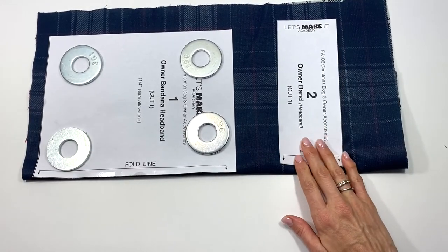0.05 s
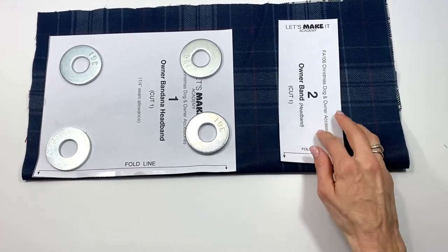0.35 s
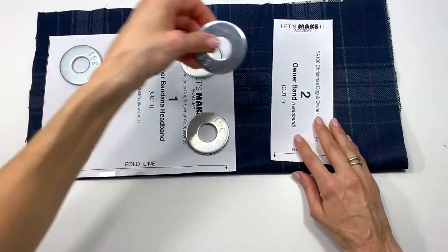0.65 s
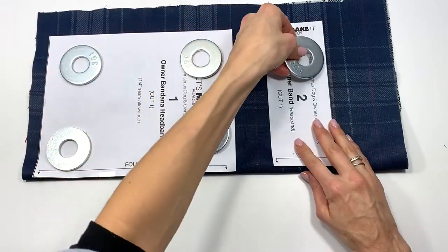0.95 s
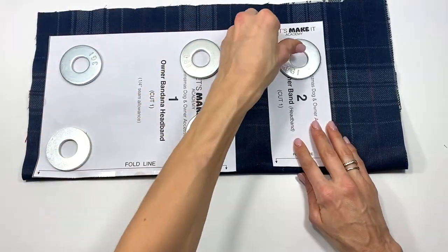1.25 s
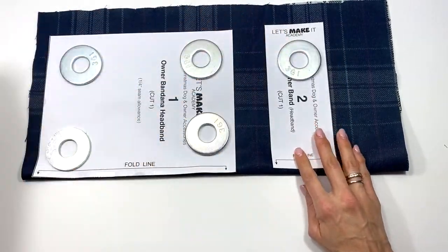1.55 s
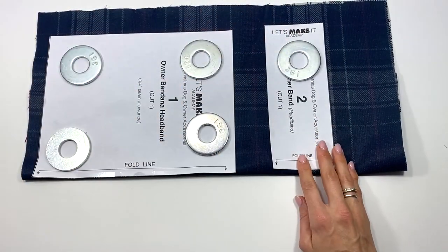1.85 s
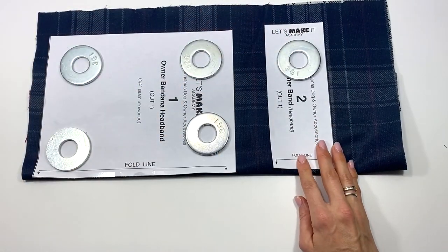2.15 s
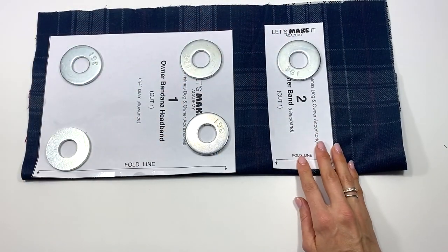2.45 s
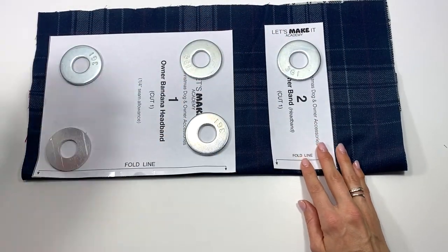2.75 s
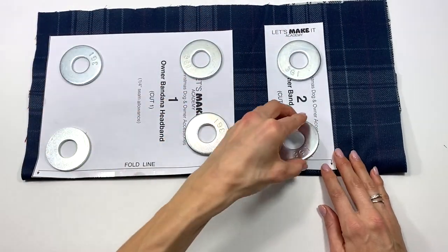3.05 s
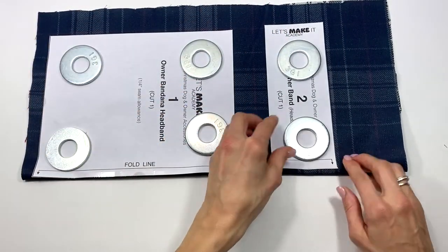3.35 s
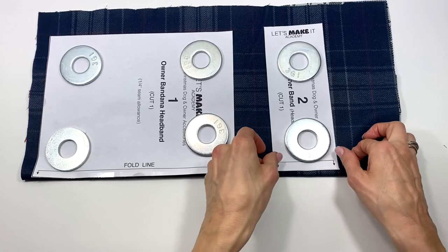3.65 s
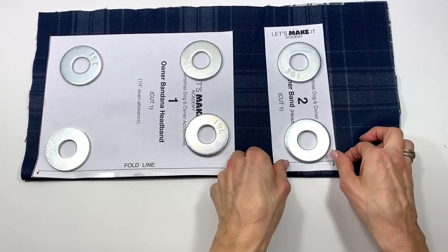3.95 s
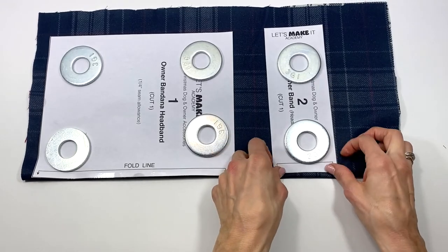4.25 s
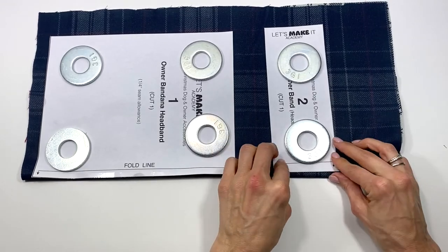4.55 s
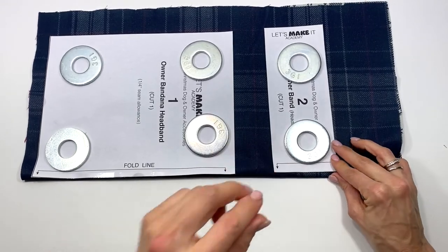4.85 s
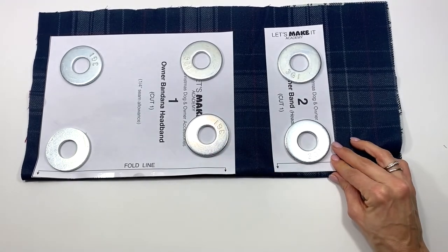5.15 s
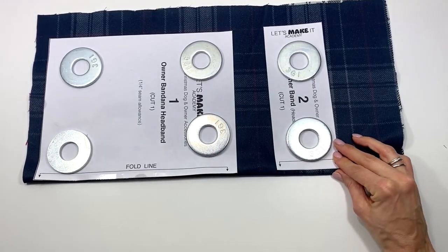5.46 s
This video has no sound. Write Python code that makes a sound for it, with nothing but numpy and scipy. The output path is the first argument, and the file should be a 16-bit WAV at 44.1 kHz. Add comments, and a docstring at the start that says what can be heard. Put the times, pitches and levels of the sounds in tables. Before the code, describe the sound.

Close up in a small quiet room, two steel washers are placed one at a time on a table padded with fabric and paper. Each is taken from a pile with a light scrape and a cluster of ringing clinks, then put down about a second later with a low, cushioned thump, the second landing in two quick knocks. Soft swishes of hands on paper run underneath, ending in a few light flicks and fingernail taps.

```python
"""Steel washers on a padded table

Heavy steel washers are picked off a pile and set down, one at a time, on paper and fabric on a table.
Steel clinks and rings on steel; each washer lands with a cushioned thunk that booms through the top.
Between times, hands slide over the paper and flick its edge. A small quiet room, a near microphone."""
import sys
import numpy as np
from scipy import signal
from scipy.fft import rfft, irfft, next_fast_len
from scipy.io import wavfile
from scipy.ndimage import uniform_filter1d

SR = 44100
rng = np.random.default_rng(int(sys.argv[2]) if len(sys.argv) > 2 else 0)


def bounce(signal):
    """Save signal as a 16-bit WAV file at the path given by the first command-line argument."""
    frames = np.transpose(np.atleast_2d(signal))
    limited = np.clip(frames, -1, 1)
    pcm = np.round(limited * 32767).astype(np.int16)
    wavfile.write(sys.argv[1], SR, pcm)


N = 247130
TIME = np.arange(N) / SR
HIT_TIME = TIME[:SR]  # every hit gets one second to ring out
# tone of snapping, creasing paper: freq_hz, level_db
PAPER_SPECTRUM = [(100, -20), (500, -8), (800, -2), (1200, -6), (1600, -1.5), (2300, 0.5), (3000, -2),
                  (4700, -5), (5400, 2), (6200, 3), (7500, -1), (10500, -7), (13000, -23), (16000, -39)]


def amp(db):
    """Decibels to gain."""
    return 10 ** (np.asarray(db) / 20)


def curve_at(points, hz):
    """A curve's value at hz, on a log-frequency axis."""
    freqs, values = np.transpose(points)
    return np.interp(np.log(hz + 1), np.log(freqs + 1), values)


def unit_hit(x):
    """Scales a hit to the energy of 10 ms at rms 1."""
    return x / np.sqrt(np.mean(np.sum(x ** 2, -1)) / (SR / 100))


def add(mix, start_s, sound):
    """Drops a sound into the mix at start_s."""
    part = mix[:, max(round(start_s * SR), 0):][:, :sound.shape[-1]]
    part += sound[..., :part.shape[1]]


def colour(x, spectrum, tilt=0, pivot_hz=2800):
    """Minimum-phase EQ with the given spectrum, tilted in dB per octave around the pivot."""
    size = 8192
    hz = abs(np.fft.fftfreq(size, 1 / SR))
    octaves = np.log2(np.maximum(hz / pivot_hz, 0.25))
    log_gain = np.log(amp(curve_at(spectrum, hz) + tilt * octaves))
    impulse = np.fft.ifft(np.exp(np.conj(signal.hilbert(log_gain)))).real[:size // 2]
    return signal.oaconvolve(x, impulse[None], axes=1)[:, :x.shape[1]]


def soften(x, corner_hz):
    """A longer contact cuts the highs above its corner."""
    return signal.sosfilt(signal.butter(3, min(corner_hz, SR / 2.2), fs=SR, output="sos"), x)


def spread(pair):
    """Two unrelated signals become left and right: narrow in the bass and very top, wider between."""
    # how alike the two channels are: freq_hz, correlation
    likeness = [(60, 0.94), (125, 1), (220, 0.92), (400, 0.62), (700, 0.17), (1400, 0.54), (3000, 0.35),
                (7000, 0.15), (11000, 1), (13000, 0.93)]
    size = next_fast_len(pair.shape[1])
    a, b = rfft(pair, size)
    alike = curve_at(likeness, np.fft.rfftfreq(size, 1 / SR))
    mid, side = a * np.sqrt((1 + alike) / 2), b * np.sqrt((1 - alike) / 2)
    return irfft([mid + side, mid - side], size)[:, :pair.shape[1]]


def noise(spectrum, grain_db=0):
    """Stereo noise of rms 1; grain_db makes some of its tiny impacts stand out."""
    grains = amp(grain_db * np.minimum(rng.exponential(1, N // 16 + 1), 6)).repeat(16)[:N]
    x = colour(spread(rng.standard_normal((2, N)) * grains), spectrum)
    return x / x.std()


def waver(per_s, depth_db):
    """A gain that glides to a new random level per_s times a second."""
    knots = np.arange(0, 6, 1 / per_s)
    levels = rng.standard_normal(2000)[:len(knots)]
    return amp(depth_db * np.interp(TIME, knots, levels))


def patchy(x, depth_db=2.8):
    """Short-lived patches of the spectrum swell and sink; rms 1."""
    bands = signal.stft(x, nperseg=512)[2]
    field = rng.standard_normal(bands.shape[:0:-1]).T
    field = uniform_filter1d(uniform_filter1d(field, size=6, axis=0), size=6, axis=1)
    out = signal.istft(bands * amp(depth_db * field / field.std()), nperseg=512)[1][:, :N]
    return out / out.std()


def gesture(start_s, length_s, db, swell_db, rise_s=0.082, fall_db_per_s=309.5):
    """Gain of one rub: the hand gathers speed, swells or slackens, then comes to rest."""
    t = TIME - start_s
    ease = np.sin(np.pi / 2 * np.clip(t / rise_s, 0, 1)) ** 2
    swell = swell_db * (np.clip(t / length_s, 0, 1) - 0.5)
    fall = fall_db_per_s * np.maximum(t - length_s, 0)
    return ease * amp(db + swell - fall)


def burst(fade_s, sharp=0):
    """A contact: a dying patter of micro-impacts, led by an impulse of relative size sharp."""
    x = unit_hit(spread(rng.standard_normal((2, SR))) * np.exp(-HIT_TIME / fade_s))
    x[:, 0] += sharp * unit_hit(np.ones(1))
    return x


def chime(modes, uneven_db, flutter_db=0, flutter_per_s=52):
    """Dying sines (pitch_hz, gain, t60_s); where the blow lands shifts their balance. Each may flutter."""
    out, knots = np.zeros((2, SR)), np.arange(200) / flutter_per_s
    for k, (hz, gain, t60) in enumerate(modes):
        phase = k * np.pi + rng.standard_normal((2, 1)) / 4
        flutter = flutter_db * np.interp(HIT_TIME, knots, rng.standard_normal(len(knots)))
        envelope = amp(uneven_db * rng.standard_normal() + flutter - 60 * HIT_TIME / t60)
        out += gain * envelope * np.sin(2 * np.pi * hz * HIT_TIME + phase)
    return out


def room(x, wet_db):
    """Adds the small room's tail, each band dying at its own speed."""
    # reverb time: freq_hz, t60_s
    decay = [(60, .45), (200, 0.14), (600, 0.14), (2000, 0.24), (6000, 0.25), (14000, 0.097)]
    hz, t, bands = signal.stft(spread(rng.standard_normal((2, SR))), SR, nperseg=256)
    bands *= amp(-60 * t / curve_at(decay, hz)[:, None])
    tail = signal.istft(bands, SR, nperseg=256)[1][:, :SR]
    tail *= np.clip(HIT_TIME / 0.0021 - 0.5, 0, 1)  # fades in just behind the direct sound
    tail /= np.linalg.norm(tail[0])
    return x + amp(wet_db) * signal.fftconvolve(x, tail, axes=1)[:, :N]


def room_tone():
    """The quiet room's steady hush."""
    # tone of the hush: freq_hz, level_db
    hush_spectrum = [(15, -23.5), (25, -5), (64, 1), (97, 5.5), (236, -8), (503, -28), (911, -27.5),
                     (1700, -13.5), (3920, 1.5), (4740, -19), (6050, -42.5), (9070, -32), (10400, -21),
                     (11600, -49), (16000, -64.5)]
    return amp(-86.5) * noise(hush_spectrum)


def table_rumble():
    """A steady low rumble in the table."""
    # tone of the rumble: freq_hz, level_db
    rumble_spectrum = [(25, -1), (50, 8.5), (85, 3.5), (130, -2), (220, -12.5), (450, -20), (900, -26.5),
                       (2000, -40.5), (5000, -60)]
    return amp(-69) * noise(rumble_spectrum)


def forearm_sweeps():
    """Forearms brush over cloth and table with a soft, uneven swish."""
    # arm movements: start_s, length_s, level_db, swell_db
    sweeps = [(0.553, 0.59, -62, -1), (2.443, 0.93, -69, -4), (3.613, 0.41, -65.5, -7.5),
              (4.228, 0.23, -71, 9), (4.542, 0.17, -64, -9.5), (4.7, 0.37, -77, 5)]
    # tone of rubbed cloth: freq_hz, level_db
    cloth_spectrum = [(40, -16), (90, -3.5), (220, -4), (400, -6.5), (750, -13), (1200, -18.5),
                      (2500, -17.5), (8000, -50.5)]
    movement = sum(gesture(*row) for row in sweeps)
    return noise(cloth_spectrum) * movement * waver(per_s=6.6, depth_db=3)


def washer_drags():
    """A washer sticks and slips across the bare table: a grainy scrape with tiny squeaks."""
    # pulls on the washer: start_s, length_s, relative_level_db, swell_db
    drags = [(-0.01, 0.28, -44.5, -4.5), (1.892, 0.37, -55.5, -19), (2.128, 0.17, -49, 0.5),
             (2.35, 0.096, -52, 1)]
    # tone of the scrape: freq_hz, level_db
    scrape_spectrum = [(40, -27), (90, -17), (220, 5.5), (500, -2.5), (800, -5.5), (1250, -10.5),
                       (2100, -24.5), (2800, -14), (6000, -31), (14000, -37)]
    # the washer slips: start_s, level_db
    slips = [(0.004, -44.5), (0.025, -53.5), (0.0495, -47), (0.085, -50.5), (0.104, -55.5), (0.122, -45.5),
             (1.975, -66), (2.105, -61.5), (2.384, -53.5)]
    # tone of a slip: freq_hz, level_db
    squeak_spectrum = [(200, -15), (1200, -4), (1700, -3), (2000, 2.5), (2300, -1), (2800, -25),
                       (6000, -23), (14000, -38.5)]
    pull = sum(gesture(*row, rise_s=0.008, fall_db_per_s=140) for row in drags)
    scrape = amp(-7) * noise(scrape_spectrum, grain_db=3) * pull * waver(per_s=99, depth_db=-1)
    attack = 1 - np.exp(-HIT_TIME / 0.0008)
    for start_s, db in slips:
        squeak = colour(burst(fade_s=0.0054) * attack, squeak_spectrum)
        add(scrape, start_s, amp(db) * unit_hit(squeak))
    return room(scrape, wet_db=-4)


def crackle(per_s, uneven_db):
    """Tiny creases in the paper give way: sparse clicks of uneven size, rms 1."""
    clicks = (rng.random(N) < per_s / SR) * amp(uneven_db * np.minimum(rng.exponential(1, N), 3))
    x = colour(spread(clicks * rng.standard_normal((2, N))), PAPER_SPECTRUM)
    return x / x.std()


def paper():
    """The sheet snaps; each stroke of a hand makes a grainy hiss, crackle and a duller brush of skin."""
    # paper snaps under a washer or finger: start_s, level_db, tilt_db_per_octave, fade_s
    ticks = [(0.333, -60, 2, 0.0019), (0.542, -59, -11, 0.002), (0.713, -48.5, 12, 0.0011),
             (0.743, -56.5, -2.5, 0.0025), (0.977, -47.5, 6, 0.018), (1.064, -54, 0.5, 0.0036),
             (1.083, -60.5, -4, 0.004), (1.196, -39, -3, 0.0051), (1.677, -48.5, 7, 0.013),
             (2.692, -60, -9, 0.0035), (3.185, -47.5, 1.5, 0.0025), (3.233, -47, -4.5, 0.006),
             (3.24, -47.5, 4, 0.0033), (3.354, -66, 10, 0.0047), (3.422, -56.5, 4.5, 0.022),
             (3.4765, -38.5, 3, 0.014), (3.806, -60.5, -3.5, 0.0022), (3.953, -52, 6.5, 0.018),
             (3.971, -51, 10.5, 0.0067), (4.119, -48.5, -2, 0.0051), (4.135, -45.5, -2, 0.0041),
             (4.288, -53.5, 2, 0.0018), (4.4272, -48.5, 3, 0.0021)]
    # a hand slides on the paper: start_s, length_s, level_db, swell_db, skin_offset_db
    strokes = [(-0.03, 0.42, -66.5, -12, -7), (0.412, 0.14, -51, -2.5, -9.5), (0.571, 0.17, -52.5, 8, -14),
               (0.751, 0.14, -54.5, -8.5, -8.5), (0.94, 0.2, -59, -18, -5.5),
               (1.113, 0.3, -63.5, -23.5, -2.5), (1.419, 0.2, -58.5, -3.5, -9),
               (1.645, 0.075, -51, -22, -4.5), (1.848, 0.29, -65.5, -14, 2),
               (2.441, 0.13, -62.5, -12.5, -1), (2.67, 0.3, -59, 1, -9), (3.057, 0.26, -60, -6, -7),
               (3.507, 0.056, -48, 4, -13), (3.597, 0.3, -70.5, 2.5, -3), (3.91, 0.093, -57.5, 1, -26),
               (4.089, 0.095, -55, -9, -13), (4.237, 0.14, -52.5, -10, -37), (4.355, 0.3, -66, -5, -9),
               (4.56, 0.15, -56.5, -0.5, -14), (4.812, 0.47, -70.5, -3, -8), (5.253, 0.15, -71.5, 1, 0),
               (5.479, 0.14, -67, 7.5, -2)]
    # tone of the paper's hiss: freq_hz, level_db
    hiss_spectrum = [(200, -9), (750, -16), (1180, -19.5), (1600, -22.5), (2400, -6), (3400, -2.5),
                     (4670, -3.5), (5600, 2), (8500, 0), (10500, -1), (11800, -11), (13000, -31.5),
                     (16000, -52)]
    # tone of brushing skin: freq_hz, level_db
    skin_spectrum = [(200, -16.5), (700, -15.5), (1100, -15), (1600, 0), (2400, -1.5), (3300, -3.5),
                     (4500, -3.5), (8000, -16), (14000, -32.5)]
    snaps, slide, skin = np.zeros((2, N)), np.zeros(N), np.zeros(N)
    for start_s, db, tilt, fade_s in ticks:
        rise_s = min(0.35 * fade_s, 0.0015)
        snap = burst(fade_s) * (1 - np.exp(-HIT_TIME / rise_s))
        add(snaps, start_s, amp(db) * unit_hit(colour(snap, PAPER_SPECTRUM, tilt)))
    for start_s, length_s, db, swell_db, skin_db in strokes:
        push = gesture(start_s, length_s, db, swell_db)
        # the skin still creeps faintly on the paper after the stroke
        creep = gesture(start_s, length_s, db - 14, swell_db, fall_db_per_s=48)
        stroke = np.hypot(push, creep)
        slide = np.hypot(slide, stroke)
        skin = np.hypot(skin, stroke * amp(skin_db))
    creases = amp(-15.5) * slide * crackle(per_s=120, uneven_db=1)
    hiss = amp(-1) * patchy(noise(hiss_spectrum, grain_db=2)) * slide * waver(per_s=120, depth_db=1.5)
    brush = patchy(noise(skin_spectrum)) * skin * waver(per_s=48, depth_db=3)
    return room(snaps + creases, wet_db=-8.5) + hiss + brush


def edge_taps():
    """A fingernail or a washer's edge clicks on the paper; the washer lying there rings very briefly."""
    # hard taps: start_s, level_db, tilt_db_per_octave, ring_db
    taps = [(3.1832, -46, 2, -46), (4.1201, -49.5, 1, -71), (4.134, -47, 0, -60),
            (4.4263, -51.5, -1.5, -43)]
    # tone of the click: freq_hz, level_db
    click_spectrum = [(100, -21), (700, 1.5), (1500, -4), (2400, 6), (4600, 2.5), (6000, -3.5),
                      (10000, -1.5), (14500, -2), (16000, -23)]
    # modes of a washer damped by paper: pitch_hz, level_db, t60_s
    muted_modes = [(5280, -8, 0.012), (5950, -2.5, 0.02), (6300, -2.5, 0.011), (6370, -3, 0.015)]
    modes = [(hz, amp(db), t60) for hz, db, t60 in muted_modes]
    out = np.zeros((2, N))
    for start_s, db, tilt, ring_db in taps:
        click = colour(burst(fade_s=0.0017, sharp=0.07), click_spectrum, tilt)
        add(out, start_s, amp(db) * unit_hit(click))
        add(out, start_s, amp(ring_db) * unit_hit(chime(modes, uneven_db=-3.5)))
    return room(out, wet_db=-12)


def table_blow(corner_hz, boom_db, thud_db, fade_s, sharp, travel_s, boom_hz=130):
    """A blow sets off the table top's modes and a dense thud; padding cuts the highs above corner_hz."""
    # modes of the table top: pitch_hz, level_db, t60_s
    table_modes = [(50.5, -6.5, 0.78), (64.8, -1.5, 0.5), (89.2, 1.5, 0.66), (108, -2, .25),
                   (128.8, -1, .42), (159.5, 2, 0.19), (197, 0.5, 0.22), (212.7, 5, 0.27),
                   (237.5, 4.5, 0.18), (293.2, 2, 0.26), (345, -1.5, 0.12), (364.3, 1.5, 0.2),
                   (441, -5.5, 0.37), (510, -10.5, 0.24), (549, -3.5, 0.23), (722, -5.5, 0.1),
                   (827, -7, 0.12)]
    # tone of the thud: freq_hz, level_db
    thud_spectrum = [(30, -40.5), (60, -27), (110, 12), (180, -3.5), (350, 6), (700, 2), (1200, -0.5),
                     (2500, -28), (8000, -58)]
    ring = np.zeros(SR)
    for hz, db, t60 in table_modes:
        bass_shelf_db = boom_db / (1 + (hz / boom_hz) ** 4)
        ring += amp(db + bass_shelf_db - 60 * HIT_TIME / t60) * np.sin(2 * np.pi * hz * HIT_TIME)
    thud = colour(burst(fade_s, sharp), thud_spectrum)
    blow = unit_hit(ring) + amp(thud_db) * unit_hit(thud)
    # bending waves disperse: travel_s holds at 200 Hz and goes as 1 / sqrt(hz), so the bass comes last
    hz = np.fft.rfftfreq(2 * SR, 1 / SR)
    dispersion = np.exp(-4j * np.pi * travel_s * np.sqrt(200 * hz))
    blow = irfft(rfft(blow, 2 * SR) * dispersion)[:, :SR]
    # the blow carries little below 45 Hz
    blow = signal.sosfilt(signal.butter(2, 45, "highpass", fs=SR, output="sos"), blow)
    return unit_hit(soften(blow, corner_hz))


def cushioned_thunks():
    """Washers land on paper and fabric: the steel is muted and only the table booms."""
    # a washer, finger or heel of a hand lands: start_s, level_db, cushion_corner_hz, boom_db
    thunks = [(0.002, -36.5, 129, 2.5), (0.242, -34.5, 100, -6), (0.408, -42.5, 135, -2.5),
              (0.543, -47, 217, 8), (1.002, -42.5, 134, 6), (1.079, -42.5, 127, 19.5),
              (1.1977, -15, 366, 2.5), (1.903, -47.5, 120, 10), (1.983, -39.5, 108, 22.5),
              (2.164, -41, 109, 21), (3.121, -51.5, 110, 17), (3.1845, -23.5, 255, -3),
              (3.243, -21, 310, -8), (3.426, -39, 165, 3), (4.14, -52.5, 122.5, -6.5),
              (4.28, -60, 121.4, 12), (4.777, -52.5, 113, 6)]
    out = np.zeros((2, N))
    for start_s, db, corner_hz, boom_db in thunks:
        blow = table_blow(corner_hz, boom_db, thud_db=-1, fade_s=0.036, sharp=0.26, travel_s=0.0052)
        add(out, start_s, amp(db) * blow)
    return out


def pile_clinks():
    """Steel on steel: a hard clack, the stack's knock, a blow through the table and the washer's ring."""
    # washers knock at the pile: start_s, clack_db, clack_tilt_db_per_octave, contact_corner_hz,
    # stack_db, table_db, face_db, rim_db, ring_tilt_db_per_octave, t60_factor, free_ring_s
    clinks = [(0.1381, -31, -0.5, 15500, -31.5, -31, -51, -29.5, -6, 0.4, .1),
              (0.1632, -30.5, 0, 15500, -35.5, -26.5, -49.5, -31.5, 2, 0.39, 0.077),
              (0.1907, -25, 2.5, 14000, -30, -26.5, -57, -27, 3.5, 0.9, .5),
              (0.1954, -38.5, 5.5, 14000, -39.5, -34, -63.5, -48.5, 4, 0.44, .1),
              (1.897, -45, 2.5, 10000, -51.5, -38.5, -53, -70, 14.5, 1.16, .1),
              (1.953, -43.5, 3.5, 9350, -46, -34.5, -62, -60, 9, 0.58, .1),
              (1.977, -50, -8, 4000, -46, -39.5, -77, -78, -1.5, 0.5, .1),
              (2.1558, -31.5, 2, 8500, -33, -33, -37, -58, 1, 2.1, 0.073),
              (2.166, -37.5, -2.5, 8000, -41, -47.5, -67, -70.5, -5, 0.8, 0.016),
              (2.192, -41, -6, 8000, -39.5, -44, -59.5, -59.5, 6.5, 0.31, .05),
              (2.249, -49, -19, 3500, -46, -46.5, -57.5, -72.5, -13.5, 0.51, .01),
              (2.258, -37, -0.5, 7600, -35, -36, -35.5, -64.5, -0.5, 0.72, 0.029),
              (2.385, -57, -1, 4000, -50, -48, -79, -68, 7, 1.2, 0.056),
              (2.403, -59, -13, 4000, -55, -44, -78, -84, 6, 0.66, 0.024)]
    # tone of the clack: freq_hz, level_db
    clack_spectrum = [(100, -30), (400, -27.5), (900, -3), (1250, -3.5), (1750, 2.5), (2400, -1.5),
                      (3300, -5), (3900, -6.5), (4700, -17.5), (5600, -7.5), (7300, -10), (9500, -17.5),
                      (13000, -17.5), (16000, -36)]
    # modes of washers pressed together in the stack: pitch_hz, level_db, t60_s
    stack_modes = [(510, -14.5, 0.06), (653, -4, 0.05), (943, -8.5, 0.19), (1422, -11, 0.27),
                   (1500, -11.5, 0.099), (1814, 2, 0.035), (2220, -3.5, 0.065), (2395, -1, 0.036),
                   (2650, -9.5, 0.049), (2900, -7.5, 0.061), (3160, -7.5, 0.023), (3830, -15, 0.081)]
    # modes of one washer: pitch_hz, base_t60_s, struck_on_face_db, struck_on_rim_db
    washer_modes = [(1700, .19, -15, -11), (1800, .09, -4, -22), (1852, .2, -20, -14),
                    (3298, .62, -28, -19), (3301, .26, 4.5, -36), (3340, .15, -6, -20),
                    (5400, .07, -26, -17), (5545, .22, -12, -32), (6094, .19, -33, -6),
                    (6205, .23, -33, -6), (6510, .09, -18, -22), (7000, .16, -32, -18),
                    (7380, .06, -15, -22), (8333, .2, -20, -29), (8520, .07, -32, -11),
                    (9535, .14, -38, -19), (10260, .2, -36, -25), (11485, .1, -28, -30),
                    (12450, .07, -44, -18)]
    # single pings of a washer muted by fingers or paper: start_s, pitch_hz, level_db, t60_s
    pings = [(0.333, 7400, -58, 0.04), (1.199, 1740, -50, 0.12), (1.953, 1790, -44, .06),
             (1.977, 2130, -47, .04), (2.192, 1717, -37, .11), (2.258, 2370, -33, .05),
             (2.258, 3360, -37, .11), (2.388, 6020, -58, 0.13), (3.355, 6400, -54, 0.04)]
    stack_detune, choke_db_per_s = 0.025, 260
    clacks, rings, blows = np.zeros((3, 2, N))
    for (start_s, clack_db, tilt, corner_hz, stack_db, table_db,
         face_db, rim_db, ring_tilt, t60_factor, free_s) in clinks:
        clack = colour(burst(fade_s=0.0055, sharp=0.07), clack_spectrum, tilt)
        add(clacks, start_s, amp(clack_db - 0.5) * unit_hit(soften(clack, corner_hz)))
        # the stack sits differently at every knock, so its modes move
        knock = [(hz * (1 + stack_detune * rng.uniform(-1, 1)), amp(db), t60)
                 for hz, db, t60 in stack_modes]
        add(rings, start_s, amp(stack_db) * unit_hit(chime(knock, uneven_db=2)))
        blow = table_blow(corner_hz=1400, boom_db=-35.5, thud_db=-5,
                          fade_s=0.037, sharp=0.095, travel_s=0.00498)
        add(blows, start_s, amp(table_db) * blow)
        modes = []
        for hz, t60, on_face_db, on_rim_db in washer_modes:
            strike = np.hypot(amp(face_db + on_face_db), amp(rim_db + on_rim_db))
            brightness = amp(ring_tilt * np.log2(hz / 3300))
            modes.append((hz, strike * brightness, t60 * t60_factor))
        # the ring flutters as the washer rocks in the fingers, then they close and choke it
        grip = amp(-choke_db_per_s * np.maximum(HIT_TIME - free_s, 0))
        add(rings, start_s, grip * chime(modes, uneven_db=0.5, flutter_db=3))
    for start_s, hz, db, t60 in pings:
        add(rings, start_s, chime([(hz, amp(db), t60)], uneven_db=5))
    lean_left = amp([[0.4], [-0.4]])
    return room(rings, wet_db=-16) + room(clacks, wet_db=-7.5) + blows * lean_left


def scene():
    """Clinks and thunks up front, handling noise behind, all over the room's hush."""
    hits = pile_clinks() + cushioned_thunks() + edge_taps()
    handling = paper() + table_rumble() + forearm_sweeps() + washer_drags()
    return hits + handling + room_tone()


def record(dry):
    """A stereo microphone whose right port hears slightly late, then a bass cut and a band limit."""
    port_delay_s, bass_cut_hz, top_hz = 3.5e-05, 44, 15800
    hz = np.fft.rfftfreq(2 * N, 1 / SR)
    right = irfft(rfft(dry[1], 2 * N) * np.exp(-2j * np.pi * hz * port_delay_s))[:N]
    bass_cut = signal.butter(4, bass_cut_hz, "highpass", fs=SR, output="sos")
    band_limit = signal.firwin(401, top_hz, window=("kaiser", 8), fs=SR)
    ports = signal.sosfilt(bass_cut, [dry[0], right])
    return signal.oaconvolve(ports, band_limit[None], "same")


dry = scene()
out = record(dry)
bounce(out)
```